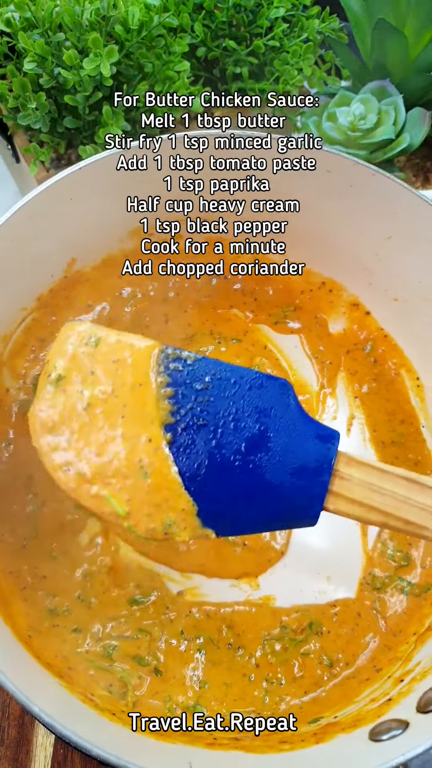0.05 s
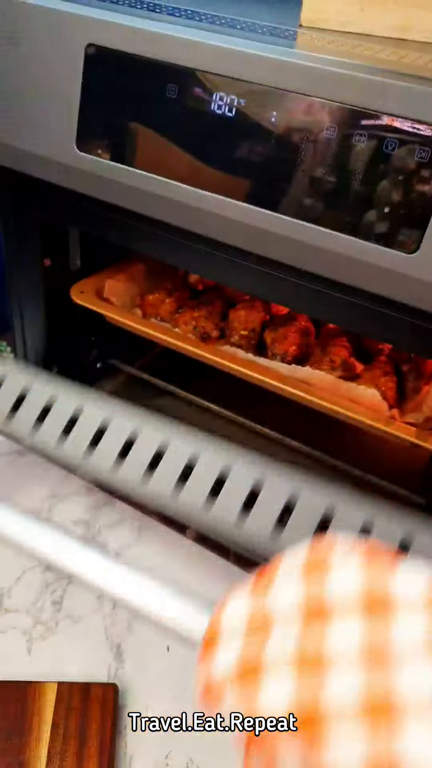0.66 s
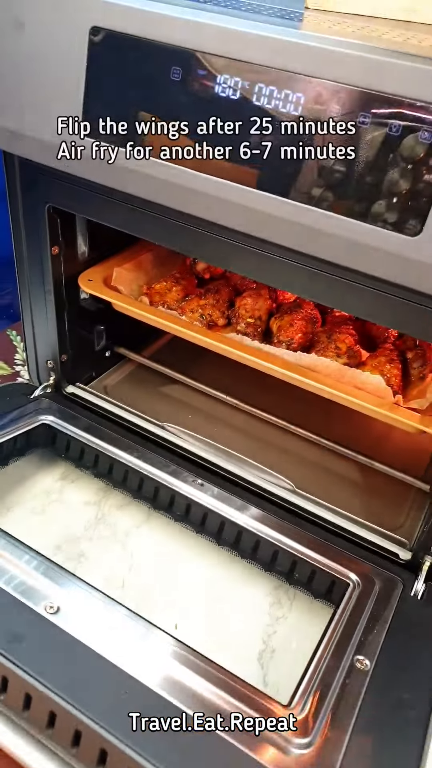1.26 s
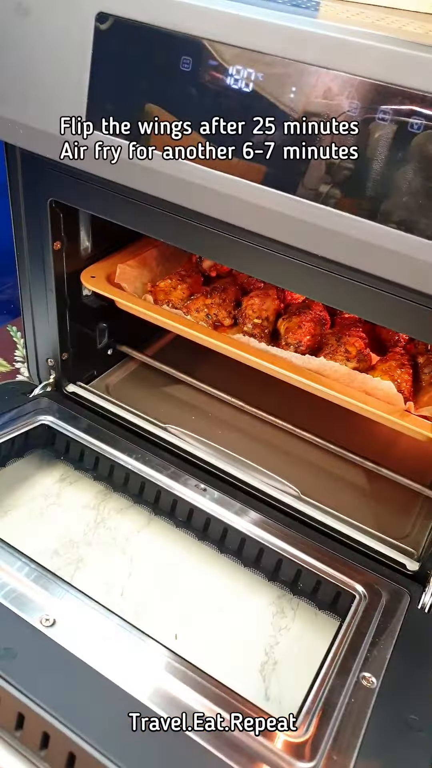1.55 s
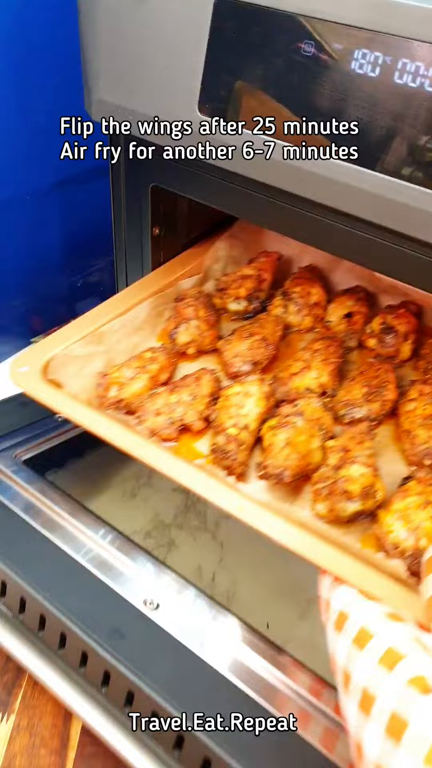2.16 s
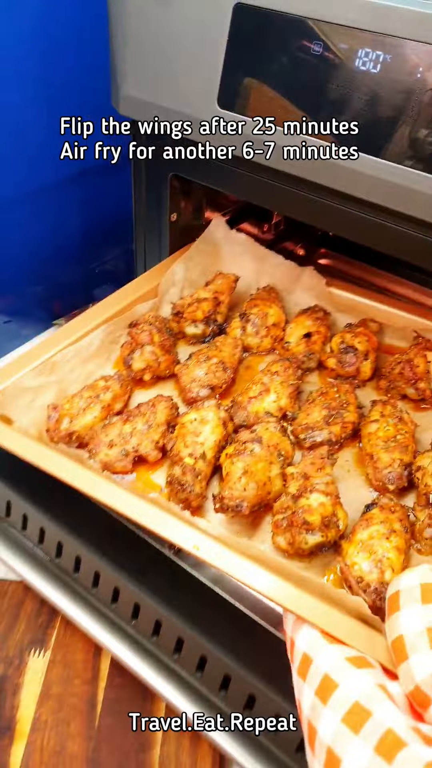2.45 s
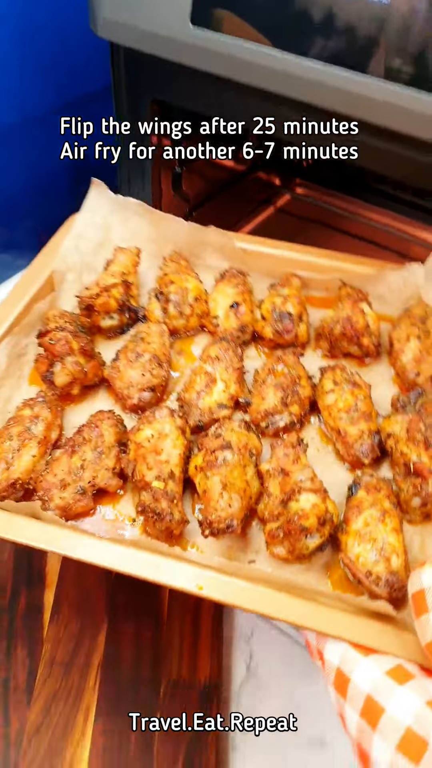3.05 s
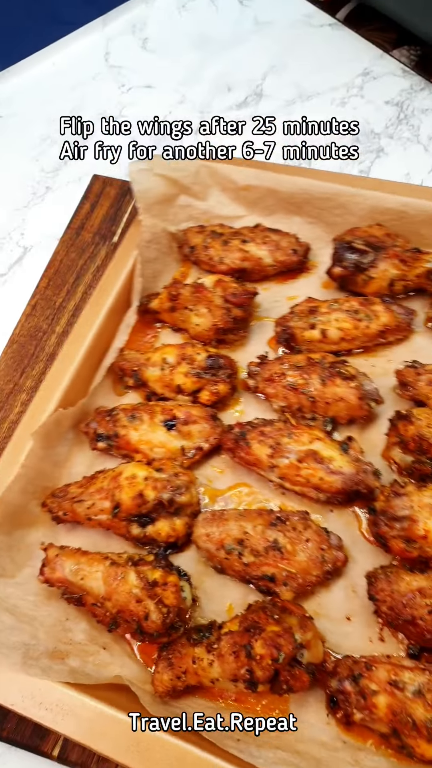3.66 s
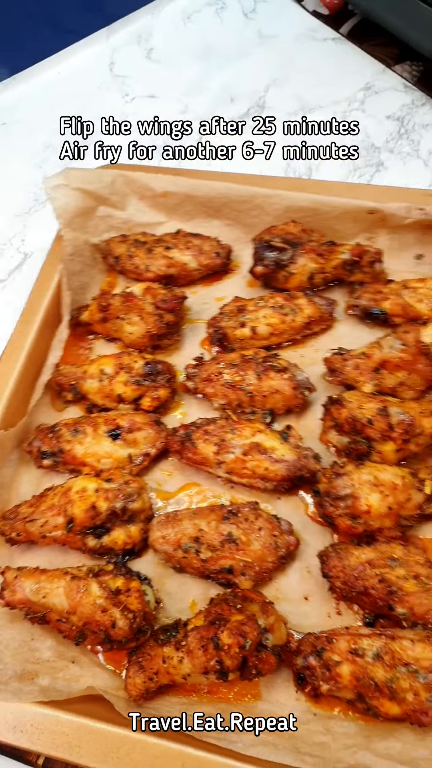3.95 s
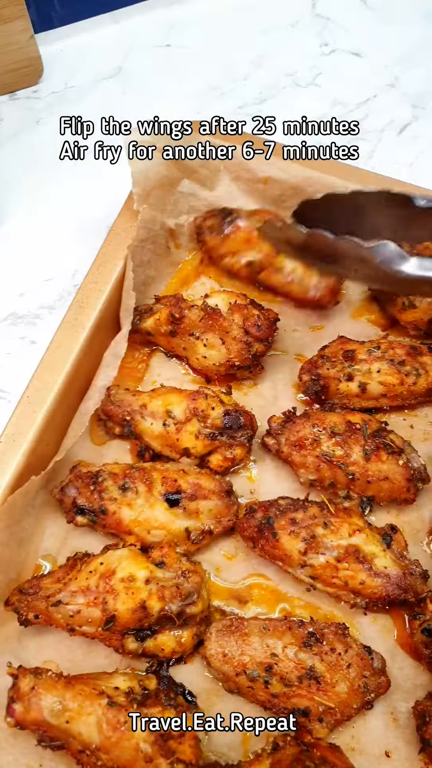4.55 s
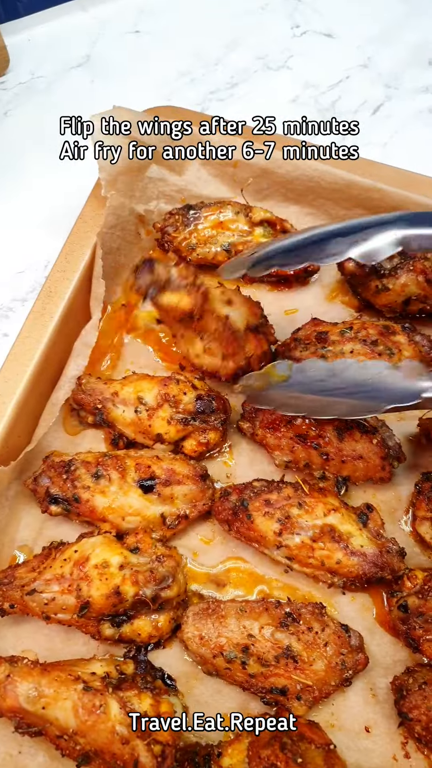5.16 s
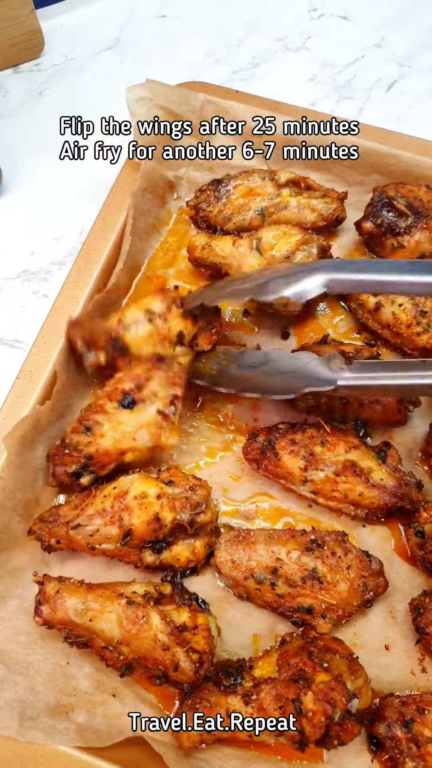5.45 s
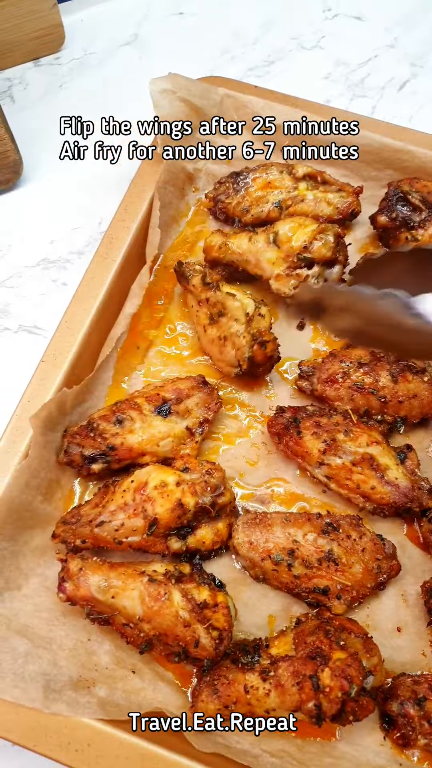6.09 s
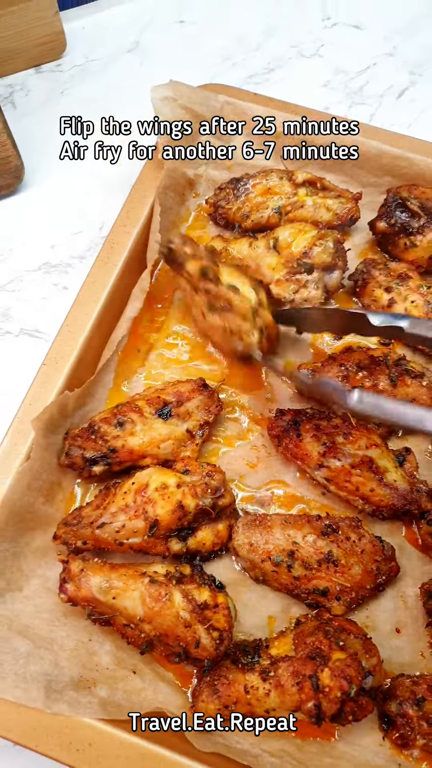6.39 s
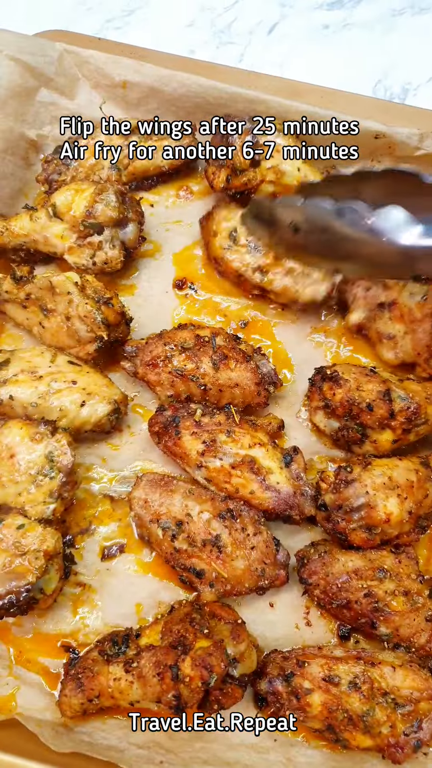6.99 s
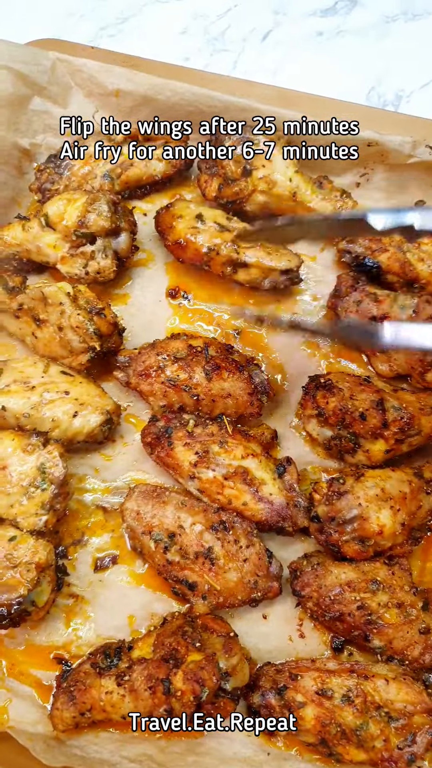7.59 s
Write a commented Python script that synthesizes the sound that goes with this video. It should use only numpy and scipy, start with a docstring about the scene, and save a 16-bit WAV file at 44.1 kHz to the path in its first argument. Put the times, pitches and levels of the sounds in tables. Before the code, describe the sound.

In a small kitchen a stove hums low and cuts off. An oven door opens softly, and a metal tray rumbles out over its rails with clunks and a thin whine. It lands close to the microphone with a knock and a thud, ticking as it cools while chicken wings sizzle faintly. Steel tongs then turn the wings, with sharp snaps, crackles and swishes of baking paper and a few ringing knocks on the tray.

```python
"""Steel tongs turn sizzling chicken wings on baking paper in a metal tray: the paper buckles in snaps and
crackles and swishes by friction, knocks excite the tray's modes, and soft thuds make the room boom.
Before this, in the same small kitchen, a hob hums, an oven door drops open, and the tray rumbles out
over its rails, is set down and ticks as it cools. Bubbles bursting in the fat make the sizzle.
Six times the sound breaks off for a few milliseconds, and whatever was ringing stops."""
import sys
import numpy as np
from scipy import signal
from scipy.fft import rfft, irfft, next_fast_len
from scipy.io import wavfile

SR = 44100
rng = np.random.default_rng(int(sys.argv[2]) if len(sys.argv) > 2 else 0)


def master_out(mix):
    """Clip the mix to full scale and print it as 16-bit PCM to the path in sys.argv[1]."""
    frames = np.transpose(np.atleast_2d(mix))
    ceiling = np.clip(frames, -1, 1)
    pcm = np.round(ceiling * 32767).astype(np.int16)
    wavfile.write(sys.argv[1], SR, pcm)


N = 345303
TIME = np.arange(N) / SR


# spectrum of cracking paper: frequency_hz, level_db
PAPER_SPECTRUM = [(150, -25), (250, -27.5), (421, -9.5), (519, -22), (586, -14), (735, -7.5), (1200, -7.5),
                  (1530, -3), (1880, -3.5), (2020, -1.5), (2400, 0), (6940, 1.5), (7840, -5.5),
                  (11100, -1.5), (16000, -3.5)]
# the loudest snaps of paper, crust and fat, and a metal tick in the oven: start_s, level_db, brightness_db
SNAPS = [(1.4348, -37, -15.5), (1.9266, -29.5, 5), (2.3038, -24, 11), (2.6084, -16.5, -2.5),
         (3.4377, -21.5, -6.5), (3.4461, -24.5, -4.5), (3.4644, -23.5, -7), (3.5065, -24, 2.5),
         (3.5159, -19, -5.5), (3.5511, -14.5, -3), (4.4157, -19, -9.5), (4.5685, -17, -1.5),
         (4.6506, -12.5, -4), (4.7619, -15.5, -4.5), (4.814, -26, -11), (4.9029, -36.5, -7),
         (5.048, -40, -6.5), (5.3184, -26.5, 12), (5.5526, -17.5, 3), (5.6534, -13.5, -3),
         (5.7668, -24, 5.5), (5.8277, -20, 16.5), (5.8656, -21.5, -1), (5.889, -14.5, -2.5),
         (5.9698, -9, -4.5), (6.0129, -19, -3.5), (6.482, -24.5, -19), (6.7833, -30, -1.5),
         (7.4377, -41, -9.5), (7.691, -28, 12)]
def snaps(crack_db=-4, cluster_db=-21, cluster_t60_s=0.16, rise_s=0.00031, size=6144):
    """Sudden stress release: paper or crust buckles, or oven metal ticks; smaller cracks follow."""
    out = np.zeros((2, N))
    onset = 1 - np.exp(-TIME[:size] / rise_s)
    for start_s, db, bright in SNAPS:
        tilt = [(450, -9 - bright), (1300, -4 - bright), (3500, 0), (7000, 0.015), (10000, 1.5 + bright)]
        crack = burst(0.034, PAPER_SPECTRUM, tilt, spot_colour(spread_db=2), size=size)
        after_cracks = grains(per_s=2400, spread_db=3.5, t60_s=0.025, size=size)
        cluster = colour(after_cracks, PAPER_SPECTRUM, tilt) * decay(cluster_t60_s, size)
        snap = from_db(crack_db) * crack + from_db(cluster_db) * cluster
        add(out, start_s, from_db(db) * snap * onset)
    return out


# rustles, a faint one at the oven door, then tongs on paper and skin: start_s, hold_s, level_db
RUSTLES = [(1.398, .01, -61), (1.418, 0.01, -56), (1.464, 0.085, -68.5), (3.436, 0.02, -41.5),
           (4.413, 0.0074, -35.5), (4.493, 0.095, -41.5), (4.553, 0.083, -38), (4.801, 0.035, -42),
           (5.07, 0.0067, -47.5), (5.099, 0.0036, -50), (5.196, 0.092, -67), (5.312, 0.022, -43),
           (5.439, 0.18, -41.5), (5.622, 0.005, -40), (5.715, .02, -45.5), (5.74, 0.074, -36.5),
           (5.843, 0.12, -34.5), (5.962, 0.026, -32.5)]
def crinkle(fine_db=-4, coarse_db=-7, rise_s=0.0051):
    """Crackling noise: the oven door rustles faintly; later paper and skin yield in small, uneven steps."""
    envelope = strokes([(s, rise_s, hold, db) for s, hold, db in RUSTLES], release_db_per_s=269.5)
    fine = colour(grains(per_s=2200, spread_db=3.7, t60_s=0.011), PAPER_SPECTRUM)
    sparse = [grains(per_s=70, spread_db=3, t60_s=0.012) for _ in range(3)]
    tilt = [(1500, -2.5), (3500, -3.5), (11000, -1.5)]
    coarse = sum(colour(cracks, PAPER_SPECTRUM, tilt, spot_colour(spread_db=3.5)) for cracks in sparse)
    return envelope * (from_db(fine_db) * fine + from_db(coarse_db) * coarse)


# spectrum of rubbed paper: frequency_hz, level_db
SWISH_SPECTRUM = [(120, -21), (200, -28), (289, -25.5), (548, -3.5), (635, -31), (709, -20), (821, -28),
                  (1160, 1), (2020, -0.5), (3250, 4), (4270, 1), (7010, 1), (8900, -6), (14300, -2.5),
                  (16000, -12)]
# a wing is dragged over the paper: start_s, rise_s, hold_s, level_db, tray_body_db
DRAGS = [(6.4, 0.0072, .02, -57, -15.5), (6.42, 0.031, .045, -41.5, -7.5),
         (6.841, 0.026, 0.023, -61, -26.5), (6.884, 0.025, 0.01, -29, -21),
         (7.018, 0.023, 0.0035, -51.5, -12), (7.261, 0.038, 0.036, -37, -8.5),
         (7.662, 0.0016, 0.019, -59, -19.5), (7.703, 0.027, .005, -54.5, -28),
         (7.784, 0.045, .02, -47, -14)]
def drags(hiss_db=2, body_db=-1, release_db_per_s=291):
    """Sliding friction: fine grains merge into a swish; weight on the wing drives the tray's modes."""
    speed = strokes([row[:4] for row in DRAGS], release_db_per_s)
    weight = strokes([(s, rise, hold, db + body) for s, rise, hold, db, body in DRAGS], release_db_per_s)
    friction = grains(per_s=10000, spread_db=2.5, t60_s=0.0077)
    hiss = colour(friction, SWISH_SPECTRUM) * flutter(depth_db=3)
    return from_db(hiss_db) * speed * hiss + from_db(body_db) * weight * rubbed(TRAY_MODES, width_hz=82)


# spectrum of the struck tray: frequency_hz, level_db
TRAY_SPECTRUM = [(88, -31.5), (150, -10.5), (601, -4.5), (1100, 2.5), (1390, -8), (1700, -3), (2140, -5.5),
                 (2700, -4.5), (3840, -8), (4580, -12), (5790, -15.5), (6510, -12), (7770, -20.5),
                 (10400, -21), (16000, -23)]
# the tray's distinct modes: pitch_hz, level_db, t60_s (capped by ring)
TRAY_MODES = [(760, -4, 0.36), (870, -18, .25), (960, -13.5, 0.11), (1030, -7, .16), (1127, 1, 0.19),
              (1254, -1, .18), (1690, -4, 0.25), (1900, -1.5, .4), (2280, -20.5, .4), (2620, -13, 0.35),
              (3325, -9, .35), (4060, -22.5, 0.2)]
# the tray meets board and tongs: start_s, level_db, bass_db, treble_db
TRAY_KNOCKS = [(3.5365, -14, -12.5, -23), (3.584, -18, -8.5, -40.5), (4.458, -31, -0.5, -41),
               (5.349, -38, -30, -5), (5.855, -45, -19, -24), (6.6538, -14.5, -22, -8.5),
               (6.719, -23, -20, -18), (6.732, -24, -52, -14)]
def tray_knocks():
    """Plate vibration: each blow sets the thin metal tray ringing."""
    return impacts(TRAY_KNOCKS, TRAY_SPECTRUM, TRAY_MODES, crack_t60_s=0.13, crack_db=-1, ring_db=-24.5,
                   bass_db=14, treble_db=9.5, top_db=-9, contact_s=0.00007)


# soft thuds, first at the oven, then from tray and wings: start_s, level_db
THUDS = [(0.828, -50.5), (1.501, -43), (1.762, -43), (2.052, -33.5), (2.309, -21), (2.649, -40.5),
         (3.137, -39), (3.589, -23), (4.465, -38.5), (4.718, -44.5), (5.343, -36.5), (5.662, -39.5),
         (6.659, -32), (6.934, -35.5)]
def thuds(boom_hz=102, boom_t60_s=0.33, boom_db=-5, push_t60_s=0.38, push_db=-7, size=16384):
    """Room mode: a soft thud sets off the small kitchen's low boom near 100 Hz."""
    out, t = np.zeros((2, N)), TIME[:size]
    boom = from_db(boom_db) * np.sin(2 * np.pi * boom_hz * t) * decay(boom_t60_s, size)
    push_spectrum = [(45, -20.5), (90, 9.5), (190, 2.5), (420, -9), (900, -32), (4000, -73)]
    for start_s, db in THUDS:
        rise_s = 0.005 * from_db((-30 - db) / 2)   # gentler thuds build up more slowly
        push = from_db(push_db) * burst(push_t60_s, push_spectrum, size=size)
        add(out, start_s, from_db(db) * (boom + push) * (1 - np.exp(-t / rise_s)))
    return out


# spectrum of the scraping tray: frequency_hz, level_db
SCRAPE_SPECTRUM = [(170, -4.5), (330, -7), (520, -3), (740, 2.5), (950, -22), (1700, -5.5), (2080, 6),
                   (2500, -13.5), (6000, -28.5)]
# shoves from the tongs: start_s, hold_s, level_db
NUDGES = [(5.848, .06, -45), (5.972, 0.008, -36), (6.907, 0.0041, -45)]
def nudges(rise_s=0.021):
    """Stick-slip friction: the tray scrapes a little way along the worktop."""
    shove = strokes([(s, rise_s, hold, db) for s, hold, db in NUDGES], release_db_per_s=376)
    return shove * flutter(depth_db=3.5) * colour(air(N), SCRAPE_SPECTRUM)


# a steel tip rubs the tray: start_s, rise_s, hold_s, level_db
SQUEAK = [(6.89, 0.013, 0.006, -35)]
def squeak(pitch_hz=1130):
    """Friction-driven resonance: the tip sticks and slips on one tray mode, with weak overtones."""
    tone = rubbed([(pitch_hz, 0), (2 * pitch_hz, -12), (3 * pitch_hz, -12)], width_hz=45)
    return strokes(SQUEAK, release_db_per_s=400) * tone


# the hot tray ticks: start_s, level_db, ping_db, top_octave_db
TICKS = [(3.3728, -32, -8, 1), (3.688, -26, -9, 5), (3.817, -26, -8.5, 2), (3.8621, -25, -14, -4.5),
         (3.8736, -27.5, -27, -4.5), (3.9187, -35.5, -9, -2), (3.994, -34.5, -10, -20),
         (4.013, -22, -8, 5.5), (4.0276, -24.5, -20, 2), (4.055, -39, -14, -14), (4.0801, -22, -2.5, -2.5),
         (4.0968, -18, -8.5, -10.5), (4.185, -30.5, -1, -4.5), (4.2087, -32, -10.5, -9),
         (4.2468, -26, -5.5, -1.5), (4.2684, -38.5, -1, -10), (4.3054, -25, -14, 1.5),
         (4.3895, -21, -5.5, 3), (7.0713, -30.5, -5, 6)]
def cooling_ticks(crack_db=-4, ping_t60_s=0.053, rise_s=0.00022, size=6144):
    """Thermal contraction: cooling metal slips with a dry crack and a short ping near 6.5 kHz."""
    out = np.zeros((2, N))
    onset = 1 - np.exp(-TIME[:size] / rise_s)
    ping_spectrum = [(4000, -27.5), (5900, -17.5), (6480, -7.5), (7100, -9), (8500, -47), (16000, -61)]
    for start_s, db, ping_db, top_db in TICKS:
        tilt = [(500, -6.5), (2000, -3.5), (7000, -6), (10000, top_db)]
        crack = from_db(crack_db) * burst(0.034, PAPER_SPECTRUM, tilt, spot_colour(spread_db=0.5))
        ping = from_db(ping_db - 1) * burst(ping_t60_s, ping_spectrum)
        add(out, start_s, from_db(db) * (crack + ping) * onset)
    return out


# spectrum of frying fat: frequency_hz, level_db
FAT_SPECTRUM = [(880, -2.5), (1500, 5.5), (1710, -2), (1870, 1), (3150, -1), (4330, -5), (6690, -4.5),
                (8570, -13), (11700, -9.5), (16000, -17.5)]
# response of the oven's cavity: frequency_hz, gain_db
OVEN_CAVITY = [(1100, -3.5), (2000, -1), (3400, 0), (5500, 1.5), (9000, 0), (13000, 0)]
# two curves of frying, in the oven and on the board: time_s, level_db
SIZZLE_CURVES = [
    [(1.66, -60.5), (1.72, -56), (1.844, -70.5), (2.196, -54.5), (2.306, -56), (2.548, -58), (2.742, -58),
     (2.916, -60.5), (3.11, -71)],
    [(3.14, -72.5), (3.42, -59.5), (3.548, -57.5), (3.694, -57), (3.832, -59), (4.016, -61.5), (4.3, -60.5),
     (4.385, -67.5)],
]
def sizzle(oven_db=0.5, board_db=2):
    """Shot noise: countless bubbles burst in the fat, first in the oven's cavity, then in the open."""
    bubbles = grains(per_s=7700, spread_db=2.5, t60_s=0.0055)
    in_oven = level(SIZZLE_CURVES[0]) * colour(bubbles, FAT_SPECTRUM, OVEN_CAVITY)
    on_board = level(SIZZLE_CURVES[1]) * colour(bubbles, FAT_SPECTRUM)
    return from_db(oven_db) * in_oven + from_db(board_db) * on_board


# spectrum of the struck oven: frequency_hz, level_db
OVEN_SPECTRUM = [(88, -31.5), (150, -4), (315, -8.5), (414, 1), (821, -12), (923, -3.5), (1310, -10.5),
                 (2100, -10), (4950, -26), (7180, -27.5), (8230, -39), (11000, -30), (16000, -52)]
# the oven's distinct modes: pitch_hz, level_db, t60_s (capped by ring)
OVEN_MODES = [(272.2, 10, 0.13), (362, 10, 0.24), (406, 7.5, 0.14), (603, -1, 0.1), (670, 19, 0.058),
              (945, 7, 0.082), (1490, -1, 0.067), (2050, -24.5, 0.053), (2268, 15.5, 0.089),
              (2370, -2.5, 0.095), (2840, -18, 0.13), (2730, -27, 0.41)]
# door and tray meet the oven: start_s, level_db, bass_db, treble_db
OVEN_KNOCKS = [(0.659, -48, -2, -22.5), (0.823, -38, 8.5, -51), (1.055, -40.5, -17, -32),
               (1.734, -33.5, 2.5, -31.5), (1.778, -35, 0.5, -28.5), (1.835, -44, -4, -9),
               (2.002, -36.5, 9, -42), (2.305, -22, -7, -20.5), (3.132, -30.5, -11, -43.5)]
def oven_knocks():
    """Panel resonance: the oven's sheet metal answers each blow with a short clunk."""
    return impacts(OVEN_KNOCKS, OVEN_SPECTRUM, OVEN_MODES, crack_t60_s=0.076, crack_db=3.5,
                   ring_db=-25.5, bass_db=6.5, treble_db=29, top_db=-5, contact_s=0.00003)


# spectrum of the rails' rumble: frequency_hz, level_db
RUMBLE_SPECTRUM = [(35, -38), (60, -14), (103, 7.5), (141, -17.5), (279, -2), (317, -14.5), (348, -2.5),
                   (563, -14.5), (678, -9), (911, -47), (1120, -17), (1340, -33.5), (5000, -62),
                   (6500, -64.5), (11000, -120)]
# spectrum of the thin whine of rails and open oven: frequency_hz, level_db
WHINE_SPECTRUM = [(450, -13.5), (680, -5.5), (790, 0), (980, -6.5), (1250, -7.5), (2400, -14), (4000, -29)]
# the tray is pulled out: start_s, hold_s, level_db, squeal_db
PULLS = [(1.399, 0.071, -68, 1), (1.751, 0.16, -54.5, -1.5), (1.989, 0.11, -42.5, -17),
         (2.158, 0.13, -50, -11), (2.41, 0.13, -51.5, -1.5), (3.048, 0.063, -86, 23.5)]
def rails(rise_s=0.005, release_db_per_s=95, whir_from_s=2.7, whir_until_s=4.35, fade_s=0.21):
    """Stick-slip friction: the sliding tray rumbles and squeals near 800 Hz; the open oven whirs on."""
    rumble = colour(air(N), RUMBLE_SPECTRUM) + from_db(-25.5) * rubbed(OVEN_MODES, width_hz=28)
    whine = colour(air(N), WHINE_SPECTRUM)
    pull = strokes([(s, rise_s, hold, db) for s, hold, db, _ in PULLS], release_db_per_s)
    squeal = strokes([(s, rise_s, hold, db + extra) for s, hold, db, extra in PULLS], release_db_per_s)
    whir_fade = np.clip(np.minimum(TIME - whir_from_s, whir_until_s - TIME) / fade_s + 1, 0, 1)
    whir = whir_fade * (from_db(-69) * whine + from_db(-70) * rumble)
    return flutter(depth_db=1) * (pull * rumble + from_db(-0.5) * squeal * whine) + whir


# tones of the hob's coil and motor: pitch_hz, level_db
HOB_TONES = [(100.2, -30), (151, -53), (175.2, -53), (301.5, -56), (377, -71), (456, -58), (532, -66),
             (614, -63), (911, -63)]
# spectrum of its cooling fan: frequency_hz, level_db
FAN_SPECTRUM = [(30, -24.5), (65, -12.5), (110, -4), (190, 0), (270, -12.5), (450, -19), (900, -23.5),
                (1100, -33.5), (1800, -30), (3200, -40), (7200, -45), (8300, -62.5), (16000, -66)]
def hob(fan_db=-36.5):
    """Forced vibration: a coil hums at twice the mains rate, with a fan, until the first break."""
    hum = sum(from_db(db) * np.sqrt(2) * np.sin(2 * np.pi * (hz * TIME + rng.random()))
              for hz, db in HOB_TONES)
    waver = flutter(depth_db=0.6, per_s=30.3)
    fan = from_db(fan_db) * colour(air(N), FAN_SPECTRUM)
    return (hum * waver + fan) * (TIME < BREAKS_S[0])


# echoes from the tray's rim, the worktop and the wall: delay_s, gain_db
NEAR_ECHOES = [(.0011, -19), (.0029, -14), (.0058, -14)]
def early_echoes(x, gain_db=0.12):
    """Comb filtering: reflections from hard surfaces close by interfere with the direct sound."""
    out = x.copy()
    for delay_s, db in NEAR_ECHOES:
        lag = round(delay_s * SR)
        out[:, lag:] += from_db(db) * x[:, :-lag]
    return from_db(gain_db) * out


# the kitchen's reverberation time: frequency_hz, t60_s
ROOM_T60 = [(100, 0.7), (300, 0.41), (800, 0.4), (2000, 0.27), (6000, 0.23), (15000, 0.22)]
def reverberation(x, lowest_hz=125, build_s=0.00097, size=32768):
    """Diffuse field: each octave dies at its own rate; the tail stops at the next break."""
    hz, noise = np.arange(size // 2 + 1) * SR / size, rfft(air(size))
    octave = np.clip(np.round(np.log2(np.maximum(hz, 1) / lowest_hz)), 0, 7)
    tail = sum(irfft(noise * (octave == k)) * decay(at_hz(ROOM_T60, lowest_hz * 2 ** k), size)
               for k in range(8))
    tail = rms_one(tail * (1 - np.exp(-TIME[:size] / build_s))) / np.sqrt(size)
    out = np.zeros((2, N))
    for start_s, end_s in zip(BREAKS_S, BREAKS_S[1:] + [N / SR]):
        add(out, start_s, signal.fftconvolve(x[:, round(start_s * SR):round(end_s * SR)], tail, axes=1))
    return out


# spectrum of the quiet kitchen: frequency_hz, level_db
AMBIENT_SPECTRUM = [(18, -41.5), (30, -6.5), (98, 3.5), (161, -6), (364, -13.5), (554, -16.5), (780, -11),
                    (866, -18), (1130, -15.5), (4910, -21), (8300, -27.5), (12300, -19), (16000, -26)]
def ambience(level_db=-74):
    """Ambient noise: a faint, steady floor, strongest in the bass."""
    return from_db(level_db) * colour(air(N), AMBIENT_SPECTRUM)


def impacts(rows, spectrum, modes, crack_t60_s, crack_db, ring_db, bass_db, treble_db, top_db,
            contact_s):
    """Impact excitation: a dense crack and ringing modes, coloured by the blow's weight and hardness."""
    out, size = np.zeros((2, N)), 16384
    for start_s, db, bass, treble in rows:
        low_db, high_db = bass + bass_db, treble + treble_db
        contact = [(300, low_db), (900, 0.0072), (2200, 0), (6000, high_db), (14000, high_db + top_db)]
        struck = [(hz, mode_db + at_hz(contact, hz) - max(low_db, 0), t60) for hz, mode_db, t60 in modes]
        crack = from_db(crack_db) * burst(crack_t60_s, spectrum, contact, size=size)
        ringing = from_db(ring_db) * ring(struck, size)
        rise_s = contact_s * from_db(-treble)   # a dull blow is soft and builds up more slowly
        onset = 1 - np.exp(-(TIME[:size] / rise_s) ** 2)
        add(out, start_s, from_db(db) * (crack + ringing) * onset)
    return out


def ring(modes, size, longest_t60_s=0.3):
    """Free vibration: modes of random strength and phase; the load of food damps the longest."""
    strengths = from_db(rng.normal(0, 2.2, (len(modes), 2, 1)))
    return sum(strength * from_db(db) * decay(min(t60_s, longest_t60_s), size)
               * np.sin(2 * np.pi * (hz * TIME[:size] + rng.random((2, 1))))
               for strength, (hz, db, t60_s) in zip(strengths, modes))


def burst(t60_s, *spectra, size=6144):
    """Modal overlap: a crowd of modes struck at once is decaying noise, with a spike at the contact."""
    spike = 1.5 * decay(0.012, size)
    return colour(air(size), *spectra) * decay(t60_s, size) * (1 + spike) / 2


def rubbed(modes, width_hz):
    """Resonance: friction noise keeps the modes sounding; the contact damps and widens them."""
    hz = np.geomspace(150, 8000, 400)
    power = sum(from_db(db) ** 2 / (1 + (2 * (hz - centre) / width_hz) ** 2) for centre, db, *_ in modes)
    return colour(air(N), np.column_stack([hz, 10 * np.log10(power)]))


def grains(per_s, spread_db, t60_s, size=N):
    """Poisson process: tiny cracks of very uneven size, each a short puff of noise."""
    heft = np.minimum(rng.exponential(1, size), 4)
    born = rng.random(size) < per_s / SR
    energy = np.full(size, 1e-12)
    energy[born] = from_db(spread_db * heft[born]) ** 2
    fading = signal.lfilter([1], [1, -decay(t60_s, 2)[1] ** 2], energy)
    return np.sqrt(fading) * air(size)


def spot_colour(spread_db, count=18):
    """Local resonance: a random spectrum, as each spot that cracks favours its own pitches."""
    return np.column_stack([np.geomspace(700, 16000, count), rng.normal(0, spread_db, count)])


def strokes(rows, release_db_per_s):
    """Amplitude envelope of hand movements: each gathers speed, holds, then dies away."""
    out, t = np.zeros((2, N)), TIME[:SR]
    for start_s, rise_s, hold_s, db in rows:
        attack = np.minimum(t / rise_s, 1) ** 2
        fall_db = release_db_per_s * np.maximum(t - rise_s - hold_s, 0)
        add(out, start_s, attack * from_db(db - fall_db))
    return out


def flutter(depth_db, per_s=70):
    """Amplitude modulation: a gain that wanders between random steps."""
    steps = from_db(depth_db * rng.standard_normal(1024))
    return np.interp(TIME * per_s, np.arange(len(steps)), steps)


def air(size, alike_hz=420, direct_share=0.15):
    """Interaural coherence: stereo noise, alike in the bass, mostly unlike above; the right ear lags."""
    padded = next_fast_len(size)
    hz = np.arange(padded // 2 + 1) * SR / padded
    mid, side = rng.standard_normal((2, 2 * len(hz))).view(complex)
    alike = np.clip(direct_share + (1 - direct_share) / (1 + (hz / alike_hz) ** 2), 0, 1)
    spectra = np.sqrt(1 + alike) * mid + np.sqrt(1 - alike) * side * [[1], [-1]]
    left, right = irfft(spectra, padded)[:, :size]
    return rms_one(np.array([left, np.roll(right, 8)]))


def colour(x, *spectra):
    """Filters in cascade: the spectra multiply, rolling off below the first one's range; rms 1."""
    size = next_fast_len(x.shape[-1])
    hz = np.arange(size // 2 + 1) * SR / size
    roll_off = np.minimum(hz / spectra[0][0][0], 1) ** 2
    gain = from_db(sum(at_hz(points, hz) for points in spectra)) * roll_off
    return rms_one(irfft(rfft(x, size) * gain, size)[..., :x.shape[-1]])


def at_hz(points, hz):
    """Interpolation on a log-frequency axis."""
    where, value = np.transpose(points)
    return np.interp(np.log(np.maximum(hz, 1)), np.log(where), value)


def level(curve):
    """Gain interpolated in decibels, silent outside the curve."""
    s, db = np.transpose(curve)
    return from_db(np.interp(TIME, s, db)) * (TIME >= s[0]) * (TIME <= s[-1])


def decay(t60_s, size):
    """Exponential damping: 60 dB lost in t60_s."""
    return np.exp(-np.log(1000) * TIME[:size] / t60_s)


def pan(left_db):
    """Interaural level difference as two channel gains."""
    return from_db(np.array([[left_db], [-left_db]]) / 2)


def from_db(db):
    """Decibels to amplitude ratio."""
    return 10 ** (np.asarray(db) / 20)


def rms_one(x):
    """Normalisation to unit rms."""
    return x / np.sqrt(np.mean(x ** 2) + 1e-20)


def add(out, start_s, sound):
    """Superposition: mix in a sound, which lasts at most until the next break."""
    start = round(start_s * SR)
    end = min([start + sound.shape[-1], N] + [round(s * SR) for s in BREAKS_S if s > start_s])
    out[:, start:end] += sound[..., :end - start]


def scene():
    """Direct-to-reverberant ratio: the oven is further off and wetter; the tray is close, a bit left."""
    oven = oven_knocks() * pan(left_db=2)
    tray = tray_knocks() * pan(left_db=2)
    clicks = cooling_ticks() * pan(left_db=5) + snaps() * pan(left_db=3)
    paper = early_echoes(crinkle() + drags()) * pan(left_db=3)
    handling = paper + (nudges() + squeak()) * pan(left_db=1)
    click_wet_db = np.where(TIME < BREAKS_S[1], -4, -10)
    room = reverberation(from_db(-1.5) * oven + from_db(-10.5) * tray
                         + from_db(click_wet_db) * clicks + from_db(-16.5) * handling)
    sustained = hob() * pan(left_db=2) + (rails() + early_echoes(sizzle())) * pan(left_db=2.2)
    background = ambience()
    return handling + clicks + tray + thuds() * pan(left_db=2) + oven + sustained + room + background


# instants at which the sound breaks off: time_s
BREAKS_S = [0.643, 3.125, 4.493, 5.438, 6.502, 7.66]
def record(dry, cutoff_hz=15900, fade_s=0.002):
    """Gating and band limiting: a few silent milliseconds at the start and each break; a low-pass."""
    from_break_s = np.min(np.abs(TIME - np.array([0] + BREAKS_S)[:, None]), axis=0)
    gate = np.clip(from_break_s / fade_s - 1.5, 0, 1)
    low_pass = signal.ellip(10, 0.2, 80, cutoff_hz, fs=SR, output="sos")
    return signal.sosfilt(low_pass, dry * gate)


dry = scene()
out = record(dry)
master_out(out)
```